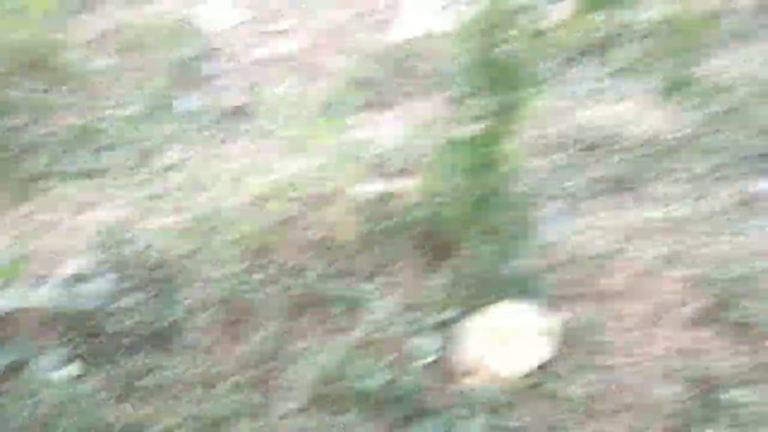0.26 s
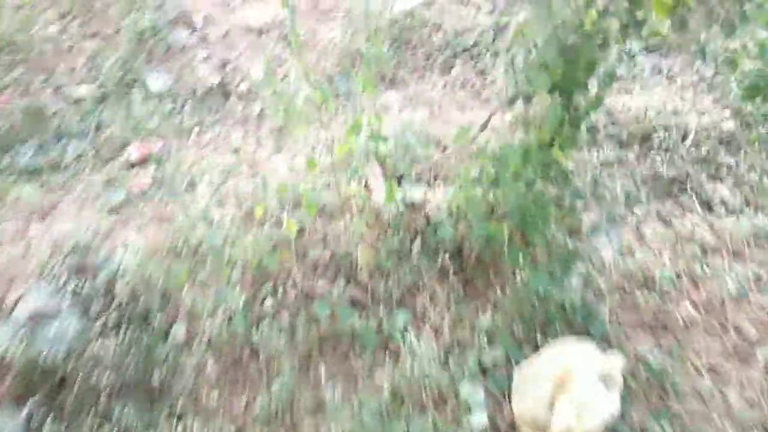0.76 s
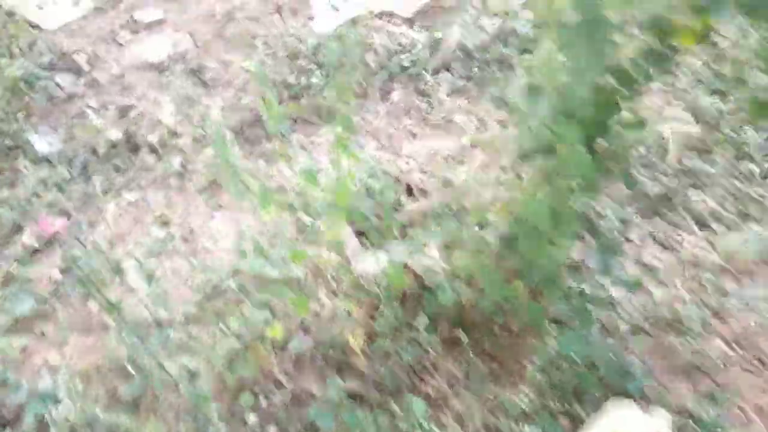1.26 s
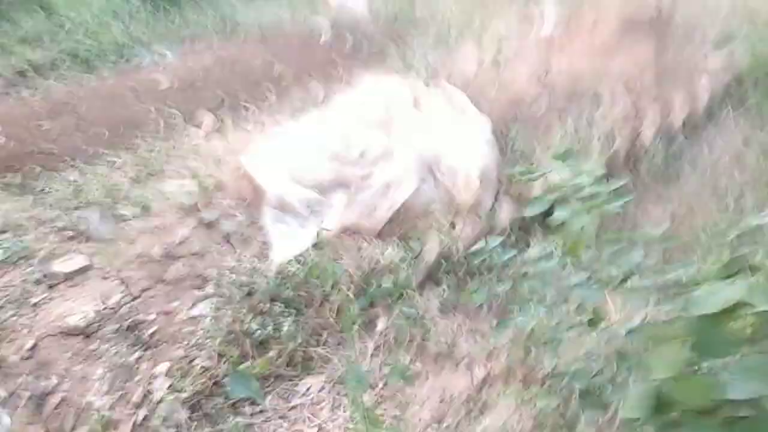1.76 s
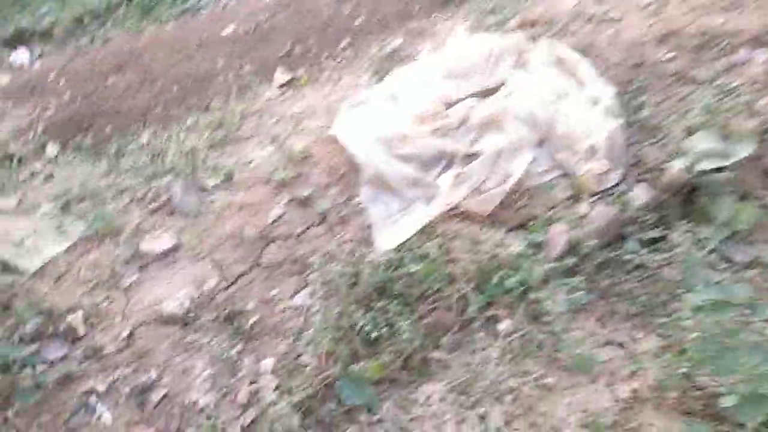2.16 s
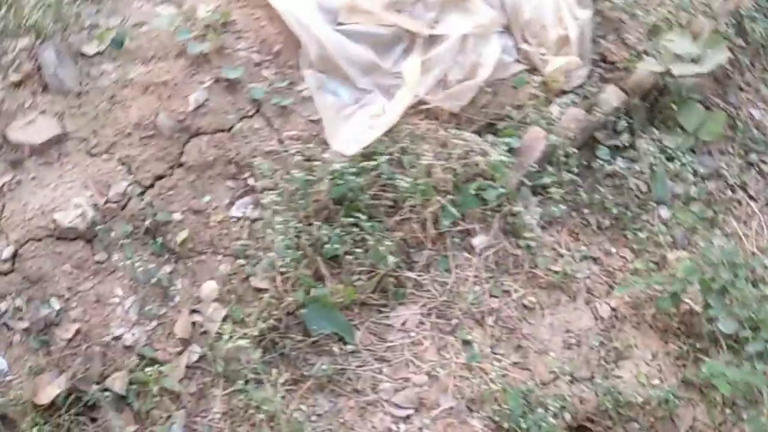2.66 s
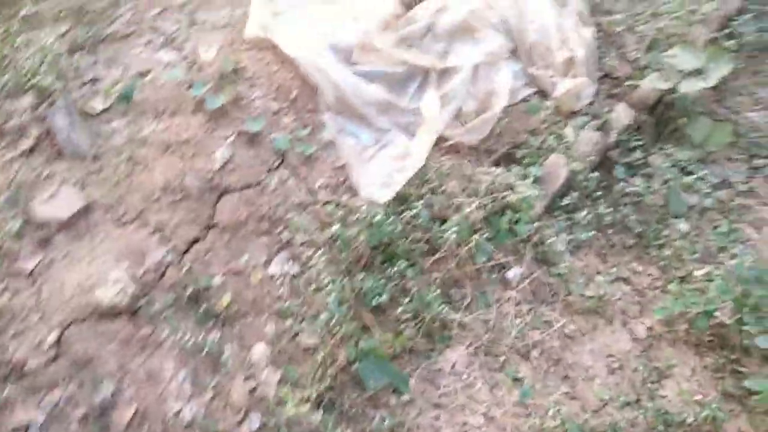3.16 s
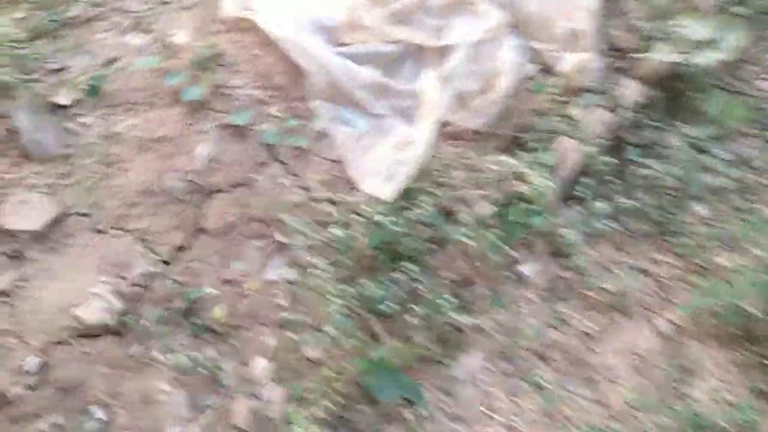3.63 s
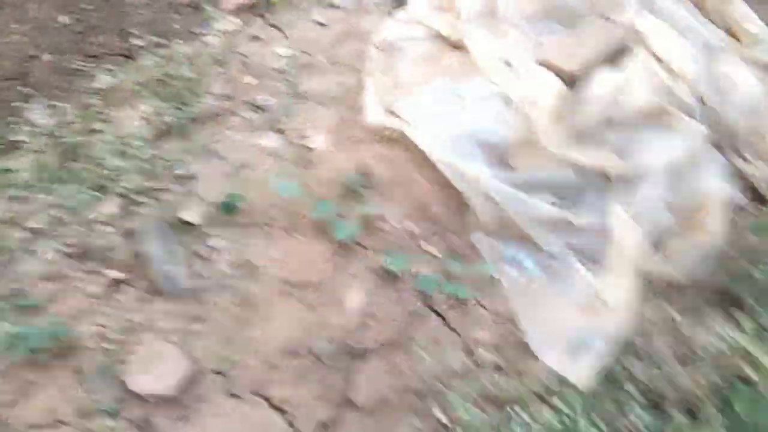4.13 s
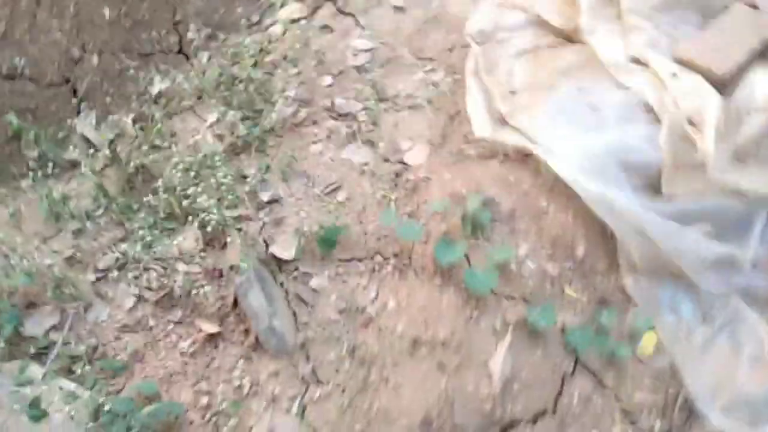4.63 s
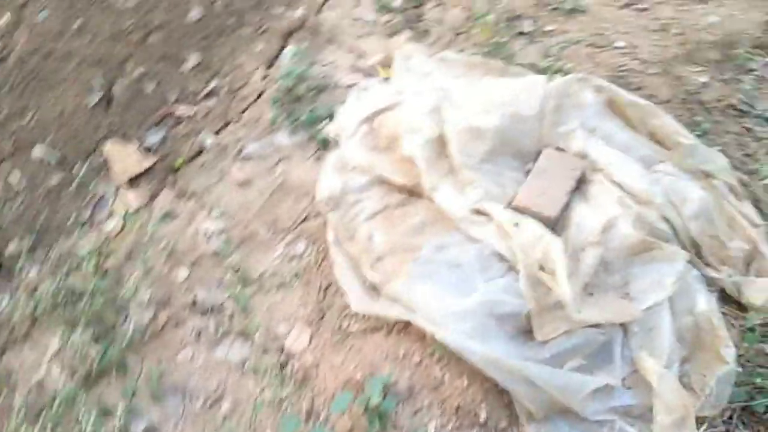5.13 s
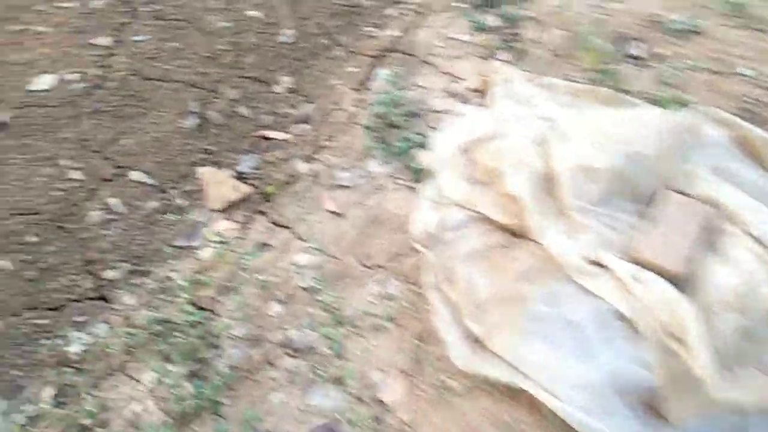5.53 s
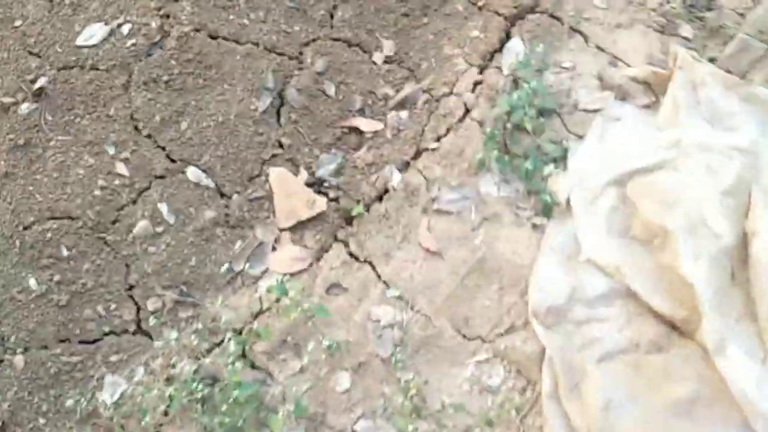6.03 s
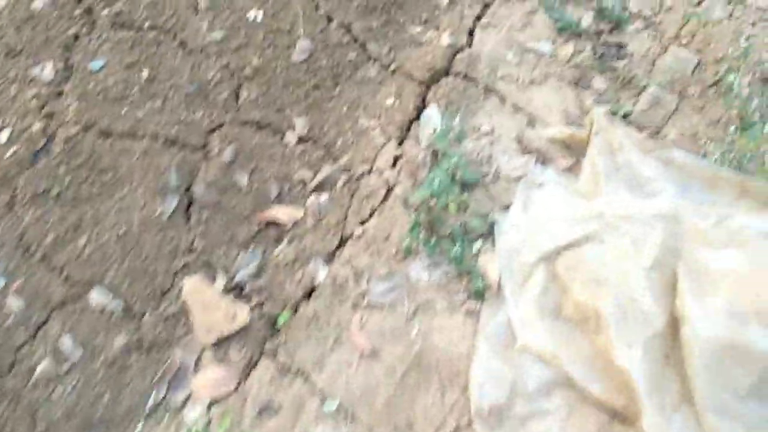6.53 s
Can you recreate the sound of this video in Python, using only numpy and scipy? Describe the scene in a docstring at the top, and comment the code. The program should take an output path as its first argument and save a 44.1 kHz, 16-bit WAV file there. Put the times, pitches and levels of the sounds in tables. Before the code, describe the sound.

Close, unhurried footsteps crackle and scuff through dry plants and crumbly earth in a quiet open field. Birds nearby soon join in with hoarse squawks, a run of two-note calls and brief whistles, then keep chattering over the steps. Stems crack sharply, loudest just past the middle. The hand-held microphone picks up dull bumps and light rubbing, while other birds call faintly far away.

```python
"""Slow footsteps on dry grass, dead leaves and baked earth at a field's edge, heard from a hand-held phone.
Each step crushes stalks and grinds crumbs of soil. Single stems snap, feet and hand thud softly,
and fingers rub the phone. Birds squabble in a nearby tree with raspy chirps that rise and fall,
a second bird cuts in with quick whistles, and others call faintly from far off over quiet air."""
import sys
import numpy as np
from scipy import signal
from scipy.fft import rfft, irfft, next_fast_len
from scipy.io import wavfile
from scipy.ndimage import uniform_filter1d, map_coordinates

SR = 44100
rng = np.random.default_rng(int(sys.argv[2]) if len(sys.argv) > 2 else 0)


def bounce(signal):
    """Save signal as a 16-bit WAV file at the path given by the first command-line argument."""
    frames = np.transpose(np.atleast_2d(signal))
    limited = np.clip(frames, -1, 1)
    pcm = np.round(limited * 32767).astype(np.int16)
    wavfile.write(sys.argv[1], SR, pcm)


N = 299120
TIME = np.arange(N) / SR

# Levels in a column compare its events; each layer's overall loudness is set in the functions.
# A foot takes the weight: full_weight_s, attack_s, hold_s, release_s, grass_db, leaves_db, soil_db
FOOTFALLS = [(0.275, 0.0053, 0.032, 0.066, -50, -49, -49), (0.945, 0.032, 0.066, 0.031, -48, -46, -51.5),
             (1.759, 0.047, 0.029, 0.018, -48.5, -43, -49.5),
             (2.467, 0.0045, 0.061, 0.061, -50, -45, -51.5), (3.868, 0.0097, 0.021, 0.037, -47.5, -42, -49),
             (4.482, 0.01, 0.06, 0.064, -44.5, -37, -50.5), (5.856, 0.0069, 0.02, 0.0047, -51, -44, -50.5),
             (6.776, 0.0049, 0.047, .03, -47, -44, -48)]
# A foot drags through the plants between steps: start_s, length_s, grass_db, leaves_db, soil_db
FOOT_DRAGS = [(0.0, 0.24, -76.5, -70, -65.5), (0.17, 0.16, -67.5, -69, -93),
              (0.506, 0.17, -73.5, -66, -66.5), (0.768, 0.16, -64.5, -64.5, -60),
              (1.362, 0.16, -83, -65, -56.5), (1.546, 0.14, -65, -56, -65), (1.78, 0.25, -61.5, -56, -62.5),
              (2.556, 0.32, -57, -55, -63.5), (2.712, 0.071, -55, -49, -80),
              (3.995, 0.091, -67, -61.5, -63), (4.553, 0.057, -57, -69, -52), (5.829, 0.11, -63, -78, -58),
              (6.254, 0.14, -59, -52, -74.5), (6.629, 0.19, -63.5, -60.5, -68)]
# The ground never lies quite still: grass_db, leaves_db, soil_db
RESTING_GROUND_DB = [-82, -83.5, -86]
# Tone of crackling grass, crunching leaves, grinding soil and a cracking stem: frequency_hz, gain_db
GRASS_TONE = [(3410, -30), (4400, -4.5), (5800, -8.5), (6700, -7.5), (7400, -2), (8850, -6), (9950, -13.5),
              (10600, -22.5), (11100, -6.5), (14400, -61.5), (22000, -120)]
LEAF_TONE = [(2000, -29.5), (2500, -27), (2800, -1), (3300, -7), (3800, -3.5), (4300, -5.5), (4700, -18),
             (5400, -5), (6200, -21.5), (7500, -18)]
SOIL_TONE = [(90, -2.5), (170, -3.5), (250, 4.5), (440, 2), (600, 4), (950, 2), (1120, 2.5), (1350, -5),
             (2000, -12.5), (2800, -11), (5000, -27.5)]
CRACK_TONE = [(1500, -24), (2500, -27.5), (3050, 9), (4000, -12), (6000, -10.5), (11000, -45)]
# Stems and lumps of earth break: start_s, decay_s, crack_db, knock_db, splinter_db
STEM_SNAPS = [(0.272, 0.0077, -53, -55, -26), (0.307, 0.0055, -58, -48, -30),
              (0.7956, 0.012, -67, -45.5, -66), (0.851, 0.011, -68, -51, -42.5),
              (0.9865, 0.0086, -34.5, -39, -38), (1.364, 0.0048, -40.5, -53, -46),
              (1.407, 0.0021, -41.5, -64, -59), (1.418, 0.0072, -46, -44, -62),
              (1.758, 0.004, -41, -36, -28), (1.7801, 0.0015, -34, -35.5, -33),
              (2.144, 0.0029, -33, -71, -42), (2.485, 0.0038, -28.5, -33, -50),
              (2.609, 0.0049, -34, -50.5, -30.5), (2.748, 0.0019, -34.5, -58, -26.5),
              (3.1164, 0.0057, -48, -76, -44), (3.909, 0.0027, -30, -27.5, -29),
              (3.968, 0.0043, -60, -42.5, -62), (4.306, 0.0066, -40, -51.5, -69),
              (4.421, 0.0037, -27.5, -51.5, -72), (4.493, 0.0025, -24.5, -58, -27),
              (4.5003, 0.0044, -23, -58, -16.5), (4.507, 0.0012, -45, -56, -27),
              (4.5489, 0.0013, -13.5, -52, -31), (5.778, 0.0016, -29.5, -47, -73),
              (5.862, 0.003, -29, -57, -43), (6.586, 0.01, -68, -54, -82), (6.765, 0.0047, -31, -47, -39)]
# Soft thuds of feet and hand: start_s, level_db, decay_s
SOFT_THUDS = [(0.128, -58.5, 0.019), (0.341, -45, 0.02), (0.573, -49.5, 0.012), (0.987, -35, 0.0083),
              (1.098, -48, 0.0029), (1.702, -53.5, 0.027), (1.897, -49.5, 0.0096), (2.036, -53, 0.012),
              (2.469, -47.5, 0.033), (2.612, -48.5, 0.034), (3.425, -61.5, 0.01), (3.468, -50, 0.0066),
              (3.546, -57.5, 0.019), (3.658, -52.5, 0.02), (3.87, -44.5, 0.0095), (3.934, -37, 0.0066),
              (3.999, -37.5, 0.0054), (4.151, -49.5, 0.0082), (4.29, -52.5, 0.011), (4.574, -46, 0.015),
              (4.663, -46.5, 0.0076), (5.809, -47, 0.01), (5.885, -52.5, 0.021), (6.082, -59.5, 0.015),
              (6.353, -54.5, 0.013), (6.479, -47.5, 0.031), (6.584, -47, 0.0066), (6.687, -50.5, 0.014)]
# Near birds' squawks that rise and fall: start_s, length_s, top_pitch_hz, level_db, rasp_0_to_1
ARCHED_SQUAWKS = [(1.511, 0.14, 2020, -51, 0.54), (1.739, 0.12, 2213, -47, 0.62),
                  (3.255, 0.093, 2350, -42.5, 0.17), (3.375, 0.15, 1843, -50, 1),
                  (3.476, 0.11, 2203, -44, 0.54), (3.703, 0.11, 2353, -47.5, 0.41),
                  (3.938, 0.1, 2288, -44, 0.21), (4.121, 0.195, 2078, -41, 0.91),
                  (4.404, 0.1, 2147, -48.5, 0.48), (4.642, 0.11, 2263, -44.5, 0.48),
                  (4.751, 0.11, 1895, -44, 0.94), (4.869, .14, 2120, -43.5, 0.79),
                  (5.131, 0.1, 2213, -45.5, 0.35), (5.375, 0.11, 2180, -48, 0.67),
                  (5.651, 0.14, 2147, -50, 0.88), (6.201, 0.19, 1948, -44, 1),
                  (6.682, 0.15, 2034, -42.5, 1)]
# A run of two-note calls: start_s, low_note_db, high_note_db, high_note_rasp_0_to_1
NOTE_PAIRS = [(1.96, -45, -48, 0.87), (2.165, -45.5, -48.5, 0.74), (2.378, -44.5, -41.5, 0.58),
              (2.602, -44.5, -47.5, 0.6), (2.81, -44.5, -44, 0.5), (3.034, -45.5, -46, 0.51)]
# The near birds' clear overtones, and those that rasp adds: pitch_multiple, level_db
CLEAR_OVERTONES = [(2, 11.5), (3, -8.5), (4, -34.5)]
RASP_OVERTONES = [(1.5, 5), (2.5, -4), (3, -8.5), (4, -14)]
# Tone of the near birds: frequency_hz, gain_db
BIRD_TONE = [(1000, 6), (1700, -10.5), (2200, 1), (2500, -7.5), (2850, 0.5), (4100, -2), (4700, -7.5),
             (5500, 5.5), (6500, -10.5), (7400, 6.5), (10000, 1)]
# A second bird's whistles: start_s, length_s, start_pitch_hz, middle_pitch_hz, end_pitch_hz, level_db
WHISTLES = [(2.133, 0.025, 4760, 4490, 3870, -46), (2.891, 0.068, 4450, 5720, 6450, -51),
            (2.915, 0.041, 2810, 2980, 3280, -48.5), (2.953, 0.032, 3700, 4010, 4240, -40)]
# Fingers rub the phone: start_s, length_s, level_db
FINGER_RUBS = [(1.841, 0.11, -57), (2.64, 0.3, -70), (3.328, 0.26, -62.5), (4.0, 0.067, -58.5),
               (4.769, 0.14, -67), (4.888, 0.053, -58.5), (5.277, 0.09, -55.5), (6.5, 0.26, -60.5)]
# Dull tone of that rubbing: frequency_hz, gain_db
RUB_TONE = [(60, -17.5), (130, 5.5), (200, 1.5), (260, -9), (370, -7), (480, -20.5), (1000, -17.5),
            (2500, -59)]
# Far birds: start_s, length_s, start_pitch_hz, end_pitch_hz, level_db
FAR_NOTES = [(0, 0.047, 3260, 3370, -71), (0.573, 0.045, 1464, 1510, -79), (0.583, 0.06, 1926, 2100, -77),
             (0.648, 0.049, 2720, 2910, -77), (4.938, 0.16, 510, 532, -70.5),
             (6.299, 0.045, 985, 1055, -74)]
# Tone of the field's quiet air: frequency_hz, gain_db
AIR_TONE = [(41, -48.5), (70, -18), (167, -1), (432, -14.5), (1710, -19), (4240, -20), (4620, -28.5),
            (8350, -29), (11000, -32.5), (14300, -65), (22000, -120)]


def footsteps(flicker_db=1.5):
    """The sole crushes grass, crumples leaves and grinds soil; each gives way in small jerks."""
    grass_level, leaf_level, soil_level = (level * from_db(flicker_db * drift(90))
                                           for level in ground_levels())
    blades, flakes, crumbs = (tiny_breaks(per_s, spread_db=4.5, rub=.25) for per_s in (2600, 1700, 1100))
    grass = grass_level * unit_power(shape_tone(ringing_bits(blades, 3630, 11620, 0.0025), GRASS_TONE))
    leaves = leaf_level * unit_power(shape_tone(ringing_bits(flakes, 2144, 6100, 0.0061), LEAF_TONE))
    grinding = 3 * crumbs + ringing_bits(crumbs, 518, 1140, 0.015)
    soil = soil_level * unit_power(shape_tone(grinding, SOIL_TONE))
    return from_db(4) * grass + from_db(-1.8) * leaves + from_db(-1.13) * soil


def ground_levels():
    """How hard grass, leaves and soil are pressed: the powers of all steps and drags add up."""
    power = np.outer(from_db(RESTING_GROUND_DB) ** 2, np.ones(N))
    for full_weight_s, attack_s, hold_s, release_s, *levels_db in FOOTFALLS:
        before = np.maximum(full_weight_s - TIME, 0)
        after = np.maximum(TIME - full_weight_s - hold_s, 0)
        weight = np.exp(-before / attack_s - after / release_s)  # builds, stays, eases off
        power += np.outer(from_db(levels_db), weight) ** 2
    for start_s, length_s, *levels_db in FOOT_DRAGS:
        stroke = signal.windows.tukey(int(length_s * SR), 0.69)  # 69% of a drag is swell and fade
        for layer, level_db in zip(power, levels_db):
            add(layer, start_s, (from_db(level_db) * stroke) ** 2)
    return np.sqrt(power)


def tiny_breaks(per_s, spread_db, rub):
    """Clicks of very uneven size over a smooth rubbing noise, held at a steady power."""
    sizes = from_db(spread_db * np.minimum(rng.exponential(1, N), 4)) * rng.choice([-1, 1], N)
    clicks = unit_power(sizes * (rng.random(N) < per_s / SR))
    crackle = clicks + rub * rng.standard_normal(N)
    return crackle / np.sqrt(uniform_filter1d(crackle ** 2, SR // 25) + 1e-9)


def ringing_bits(clicks, low_hz, high_hz, ring_s, wander=.07, count=20):
    """Each break rings one of many stalks or lumps; the pitches wander as the foot meets new ones."""
    which_bit = rng.integers(0, count, N)
    pitches_hz = np.linspace(low_hz, high_hz, count)
    rings = sum(ring(clicks * (which_bit == k), hz, ring_s) for k, hz in enumerate(pitches_hz))
    read_position = np.cumsum(1 + wander * drift(14))
    return unit_power(map_coordinates(rings, [read_position], order=3, mode="wrap"))


def snapping_stems():
    """A stem breaks in a burst of splinters and knocks on the ground."""
    cracks, knocks, splinters = np.zeros((3, N))
    t = TIME[:SR // 20]
    for start_s, decay_s, crack_db, knock_db, splinter_db in STEM_SNAPS:
        fade = np.exp(-t / decay_s)
        burst = 1.52 * (1 - fade) ** 1.19 * fade  # fibres give way one after another
        add(cracks, start_s, from_db(crack_db) * rng.standard_normal(len(t)) * burst)
        add(splinters, start_s, from_db(splinter_db) * rng.standard_normal(len(t)) * burst)
        add(knocks, start_s, from_db(knock_db) * rng.standard_normal(len(t)) * fade)
    return shape_tone(cracks, CRACK_TONE) + shape_tone(splinters, GRASS_TONE) + shape_tone(knocks, SOIL_TONE)


def thuds(base_hz=140, hard_push_db=-30, sink_s=0.0026, contact_s=0.0022, grip_shifts=22):
    """A soft push gives a short, low note that sinks in pitch, and a dull scuff."""
    thumps, scuffs = np.zeros((2, N))
    t = TIME[:SR // 8]
    # The grip shifts on the phone, adding faint thuds at random times.
    faint = [(when * N / SR, -65 + 6 * (loud - .5), 0.026) for when, loud in rng.random((grip_shifts, 2))]
    for start_s, level_db, decay_s in SOFT_THUDS + faint:
        push = from_db(level_db + 7) * (1 - np.exp(-t / contact_s)) * np.exp(-t / decay_s)
        hz = base_hz * np.exp(0.15 * drift(46, len(t)))
        hz *= 1 + from_db(level_db - hard_push_db) ** 2  # a hard push rings higher
        hz *= 1 + 0.9 * np.exp(-t / sink_s)
        add(thumps, start_s, push * np.sin(phase_of(hz)))
        add(scuffs, start_s, push * rng.standard_normal(len(t)))
    dull_scuffs = shape_tone(scuffs, [(80, -3), (150, -2.5), (380, 1), (600, -18.5), (2500, -46.5)])
    return thumps + 0.33 * dull_scuffs


def near_birds():
    """Birds squabble in a tree; echoes come from its branches, its leaves and the field's edge."""
    calls = np.zeros(N)
    for start_s, length_s, *pitches_hz, level_db, rasp in near_notes():
        add(calls, start_s, from_db(level_db) * chirp(length_s, pitches_hz, rasp))
    calls = close_echoes(shape_tone(calls, BIRD_TONE), strength=.27, longest_s=.008)
    # Small leaves send back only the high sounds.
    treble = signal.sosfilt(signal.butter(5, 4900, "high", fs=SR, output="sos"), calls)
    leaf_echo = from_db(-2) * outdoor_echoes(treble, fade_s=0.17, first_s=0.044)
    short_tail = from_db(-6.5) * outdoor_echoes(calls, fade_s=0.23, first_s=0.0068)
    long_tail = from_db(-16.5) * outdoor_echoes(calls, fade_s=0.61, first_s=0.04)
    return from_db(-0.02) * (calls + leaf_echo + short_tail + long_tail)


def near_notes(high_note_delay_s=0.046):
    """List the notes from the tree: start_s, length_s, start_hz, middle_hz, end_hz, level_db, rasp."""
    notes = [(start_s, length_s, .67 * top_hz, top_hz, .65 * top_hz, level_db, rasp)
             for start_s, length_s, top_hz, level_db, rasp in ARCHED_SQUAWKS]
    for start_s, low_db, high_db, rasp in NOTE_PAIRS:  # both notes fall
        notes.append((start_s, .056, 1750, 1650, 1500, low_db, 0.64))
        notes.append((start_s + high_note_delay_s, .062, 2200, 2100, 1560, high_db, rasp))
    return notes


def chirp(length_s, pitches_hz, rasp, flutter_hz=300, flicker_db=4, whistle_s=0.01266, whistle_db=5):
    """One note: a ragged, fluttering squawk that briefly clears into a falling whistle."""
    size = int(length_s * SR)
    progress = np.linspace(0, 1, size)
    whistle_at = .68 - 0.156 * rasp  # sooner in a harsh note
    from_whistle = (progress - whistle_at) * length_s / whistle_s
    clear = np.exp(-from_whistle ** 2)
    rough = rasp * (1 - (1 - 0.081 * rasp) * clear)
    hz = glide(pitches_hz, progress ** .85)  # the first half of the glide goes faster
    hz *= 1 - 0.0705 * rasp * from_whistle * np.sqrt(clear)  # extra drop through the whistle
    jitter = .012 * drift(700, size) + rough * (.055 * drift(1300, size) + .035 * rasp * drift(200, size))
    phase = phase_of(hz * (1 + jitter))
    tone, growl = (sum(from_db(db + flicker_db * drift(151, size)) * np.sin(k * phase) for k, db in table)
                   for table in (CLEAR_OVERTONES, RASP_OVERTONES))
    flutter = np.sin(phase_of(flutter_hz * np.exp(.25 * drift(200, size))))
    voice = (tone + rasp * rough * growl) * (1 + np.sqrt(rough) * flutter) * from_db(whistle_db * clear)
    # The lowest tone stays thin and fades in and out.
    lowest_level = from_db(-7 + 6.1 * rasp + flicker_db * drift(56.5, size))
    voice += lowest_level * np.sin(phase_of(hz * (1 + .7 * jitter)))
    return unit_power(voice * signal.windows.tukey(size, 0.046 + 0.55 * rasp))


def whistling_bird(flutter_db=5):
    """A second bird sits in the open: nearly pure, fluttering glides with little echo."""
    calls = np.zeros(N)
    for start_s, length_s, *pitches_hz, level_db in WHISTLES:
        size = int(length_s * SR)
        hz = glide(pitches_hz, np.linspace(0, 1, size)) * (1 + .012 * drift(700, size))
        loudness = signal.windows.tukey(size, .2) * from_db(flutter_db * drift(200, size))
        add(calls, start_s, from_db(level_db) * unit_power(loudness * np.sin(phase_of(hz))))
    return calls + from_db(-7.5) * outdoor_echoes(calls, fade_s=0.7, first_s=.007)


def rubbing_fingers():
    """Fingers stick and slip on the phone's case: a dull, uneven rubbing."""
    level = np.zeros(N)
    for start_s, length_s, level_db in FINGER_RUBS:
        add(level, start_s, from_db(level_db) * signal.windows.tukey(int(length_s * SR), 0.13))
    return shape_tone(level * tiny_breaks(per_s=110, spread_db=6, rub=0.23), RUB_TONE)


def far_birds(faint_count=260):
    """A few hoarse notes stand out from many faint, falling ones, all blurred by distance."""
    calls, faint = np.zeros(N), []
    for when, long, high, level_glide, loud in rng.random((faint_count, 5)):
        start_hz = 400 * 5 ** high
        end_hz = start_hz * (0.56 + 0.2976 * level_glide)
        faint.append((when * N / SR, 0.023 + 0.0832 * long, start_hz, end_hz, -82 + 6 * (loud - high)))
    for start_s, length_s, start_hz, end_hz, level_db in FAR_NOTES + faint:
        size = int(length_s * SR)
        hz = np.linspace(start_hz, end_hz, size) * (1 + .05 * drift(400, size))
        add(calls, start_s, from_db(level_db) * unit_power(np.hanning(size) * np.sin(phase_of(hz))))
    return 0.9 * calls + 2.47 * outdoor_echoes(calls, fade_s=0.11, first_s=0.0045)


def field_air(level_db=-70.5, flicker_db=0.6):
    """The quiet air of the field: a soft, low hush whose level flickers slightly."""
    hush = shape_tone(rng.standard_normal(N), AIR_TONE)
    return from_db(level_db) * hush * from_db(flicker_db * drift(41))


def close_echoes(sound, strength, longest_s, sway_s=0.0003085):
    """Six very quick echoes boost some pitches and weaken others, shifting as the phone moves."""
    delays = [rng.uniform(0.0989, 1) * longest_s + sway_s * (1 + drift(5)) for _ in range(6)]
    echoes = sum(np.interp(TIME - delay, TIME, sound) * (-1) ** k for k, delay in enumerate(delays))
    return (sound + strength * echoes) / np.sqrt(1 + len(delays) * strength ** 2)


def outdoor_echoes(sound, fade_s, first_s):
    """Trunks, leaves and ground scatter the sound back as a thin tail that drops 60 dB in fade_s."""
    t = TIME[:SR]
    scattered = rng.standard_normal(SR) * (rng.random(SR) < .05)
    tail = scattered * from_db(-60 * t / fade_s) * (t > first_s)
    return signal.fftconvolve(sound, unit_power(tail) / np.sqrt(SR))[:N]


def ring(clicks, hz, ring_s):
    """Each click starts a pure tone that drops 60 dB in ring_s."""
    decay, angle = from_db(-60 / (ring_s * SR)), 2 * np.pi * hz / SR
    return signal.lfilter([0, np.sin(angle)], [1, -2 * decay * np.cos(angle), decay ** 2], clicks + 1e-18)


def shape_tone(sound, tone):
    """Filter by (frequency_hz, gain_db) points; white noise keeps its power."""
    size = next_fast_len(N + SR // 4)
    hz, db = np.transpose(tone)
    all_hz = np.arange(size // 2 + 1) * SR / size
    gain = unit_power(from_db(np.interp(np.log(all_hz + 1), np.log(hz), db)))
    # Fold the filter so that it rings only after a click, never before it.
    folded = irfft(np.log(gain), size)
    folded[1:size // 2] *= 2
    folded[size // 2 + 1:] = 0
    return irfft(rfft(sound, size) * np.exp(rfft(folded)), size)[:N]


def drift(rate_hz, size=N):
    """A smooth random wobble, roughly 1 in size, that takes a new value rate_hz times a second."""
    positions = np.arange(size) * rate_hz / SR
    return map_coordinates(rng.standard_normal(size // 8 + 4), [positions], order=2, mode="wrap")


def glide(pitches_hz, progress):
    """A smooth curve through a start, middle and end pitch as progress goes from 0 to 1."""
    return np.polyval(np.polyfit([0, .5, 1], pitches_hz, 2), progress)


def phase_of(hz):
    """The running angle of a wave whose pitch changes."""
    return 2 * np.pi * np.cumsum(hz) / SR


def from_db(db):
    """Turn decibels into a multiplier."""
    return 10 ** (np.asarray(db) / 20)


def unit_power(sound):
    """Scale to an average power of 1."""
    return sound / np.sqrt(np.mean(sound ** 2) + 1e-20)


def add(track, start_s, sound):
    """Mix a sound into the track at a given time."""
    at = int(np.clip(start_s * SR, 0, N - 1))
    track[at:at + len(sound)] += sound[:N - at]


def scene():
    """Feet close by, birds around and the quiet air of the field, in one channel."""
    feet = close_echoes(footsteps() + snapping_stems(), strength=.26, longest_s=.005)
    air = field_air()
    feet_echo = from_db(-9) * outdoor_echoes(feet, fade_s=0.061, first_s=0.0053)
    walker = feet + feet_echo + thuds() + rubbing_fingers()
    birds = near_birds() + whistling_bird() + far_birds()
    return (walker + birds + air)[None]


def record(dry, low_hz=92, high_hz=11400):
    """The phone drops the deep bass and the highest treble."""
    thin = signal.sosfilt(signal.butter(6, low_hz, "high", fs=SR, output="sos"), dry)
    return signal.sosfilt(signal.cheby2(14, 60, high_hz, fs=SR, output="sos"), thin)


dry = scene()
out = record(dry)
bounce(out)
```